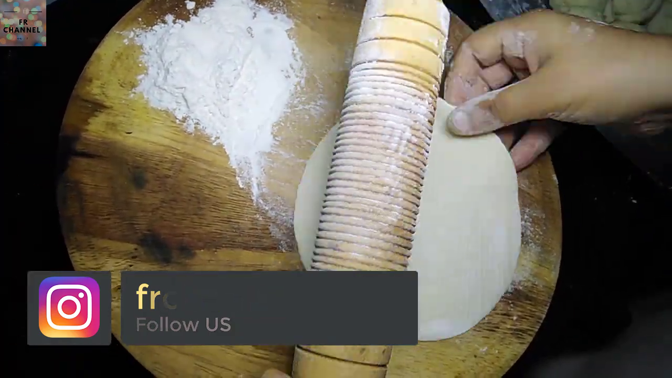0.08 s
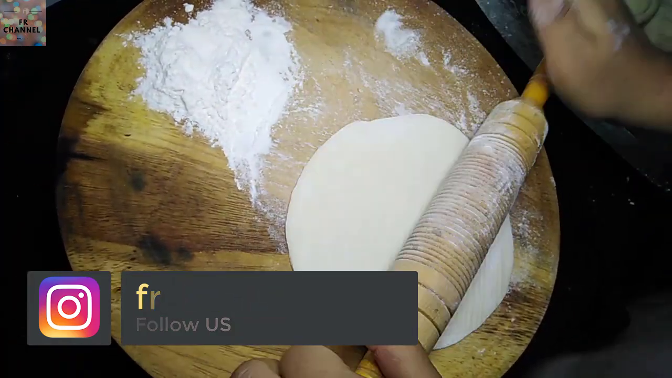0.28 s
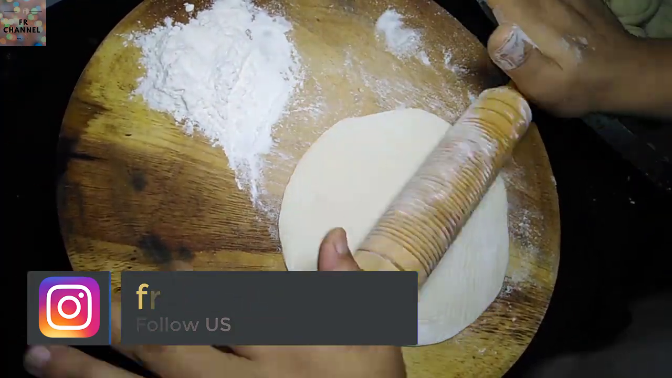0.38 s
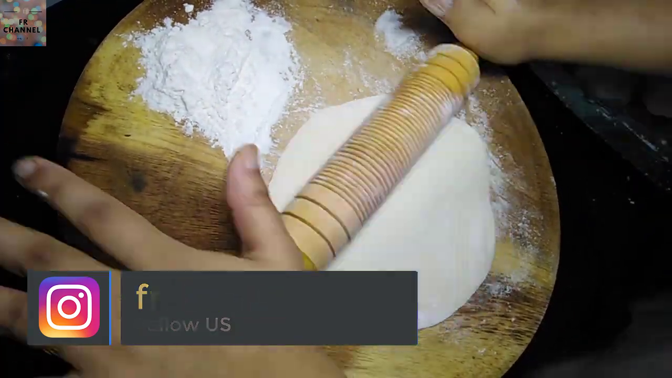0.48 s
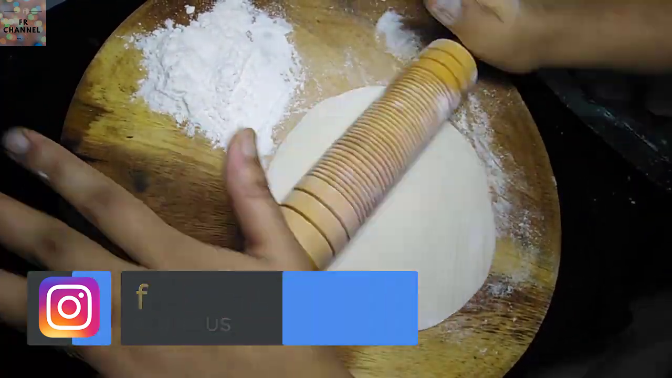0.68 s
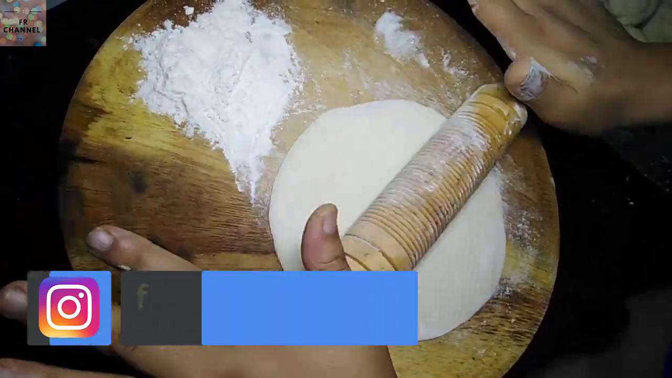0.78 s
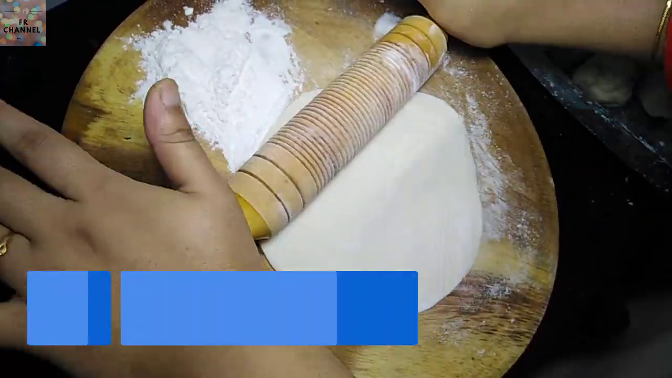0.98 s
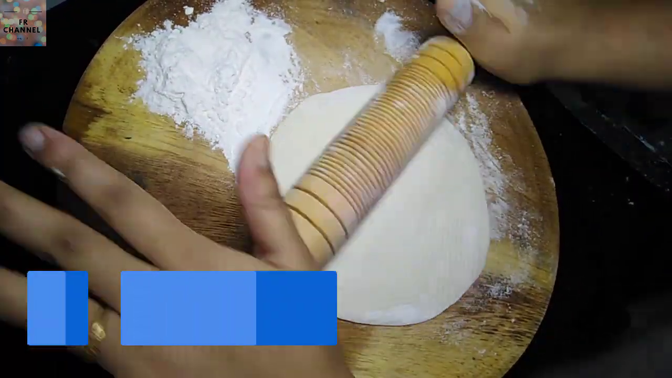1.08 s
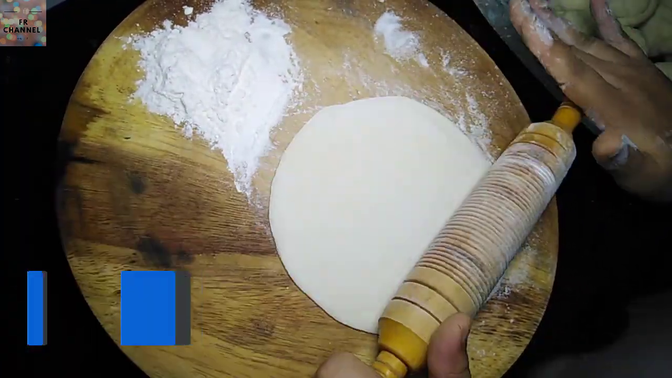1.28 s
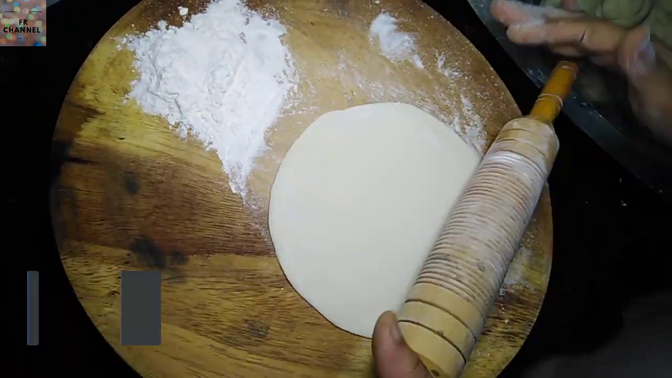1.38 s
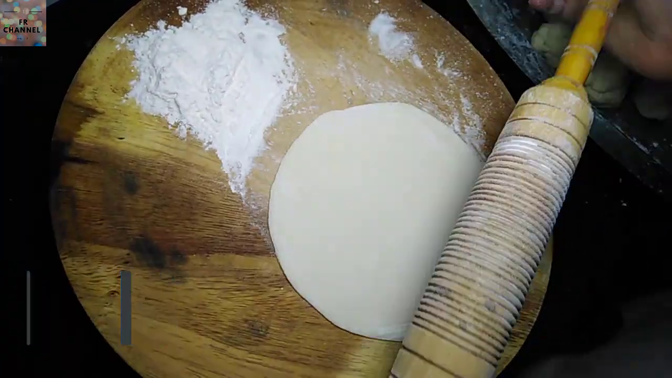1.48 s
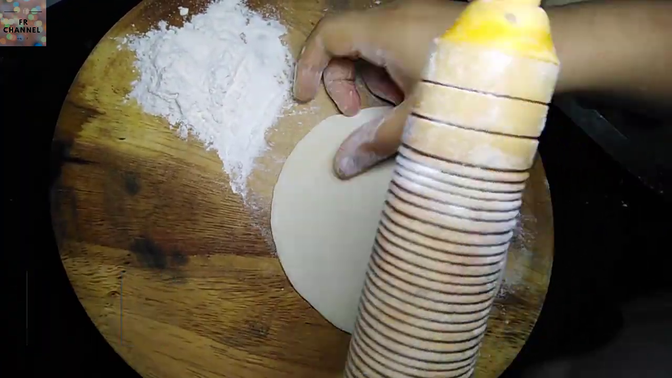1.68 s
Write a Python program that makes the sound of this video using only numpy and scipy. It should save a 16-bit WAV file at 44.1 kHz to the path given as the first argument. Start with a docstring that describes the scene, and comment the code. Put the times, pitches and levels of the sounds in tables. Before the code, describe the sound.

Rolling pin on floured dough: one dull wooden knock, then gentle dry rubbing strokes and faint taps

```python
"""A small kitchen: a grooved wooden rolling pin is set down on floured dough on a round wooden board
and rolled in short strokes. Flour grains hiss as streams of tiny clicks in shaped bands; the wood hums as
noise-driven resonances and the board rumbles as low noise. Knocks are pulses that ring the wood, the landing
thud is a rising low note, and a short rasp is noise with a climbing centre. Feedback delays make the room."""
import sys
import numpy as np
from scipy import signal
from scipy.fft import rfft, irfft, next_fast_len
from scipy.io import wavfile

SR = 44100
rng = np.random.default_rng(int(sys.argv[2]) if len(sys.argv) > 2 else 0)


def generate_wav(sig):
    """Save sig (samples, or channels by samples) to the path in sys.argv[1] as 16-bit PCM at SR."""
    pcm = np.round(np.clip(np.atleast_2d(sig).T, -1, 1) * 32767).astype(np.int16)
    wavfile.write(sys.argv[1], SR, pcm)


N = 74970
T = np.arange(N) / SR

# flour friction: (time [s], hiss level [dB], middle register relative to the hiss [dB])
FLOUR_FRICTION = [(0.0, -59, 1), (0.046, -52.5, -10.5), (0.074, -68, -4.5), (0.112, -78, 2),
                  (0.164, -83.5, -5), (0.184, -48.5, -20), (0.208, -47.5, 1), (0.24, -48, -10.5),
                  (0.254, -55, -6.5), (0.274, -59.5, -1), (0.388, -51, -2), (0.478, -56.5, -1),
                  (0.644, -50.5, -10), (0.728, -75.5, -7.5), (0.766, -74, -48), (0.794, -57, -16),
                  (0.828, -53, -11), (0.88, -58.5, -22), (0.932, -71.5, -54.5), (0.942, -72, -39),
                  (0.96, -64.5, -23), (1.012, -50, -6.5), (1.136, -60.5, -5), (1.212, -74, -3),
                  (1.24, -50, -8.5), (1.302, -52, -7), (1.358, -72, 2.5), (1.486, -77.5, -15),
                  (1.514, -73, -17), (1.562, -79, -22), (1.572, -53.5, -16), (1.614, -68, -13.5),
                  (1.628, -51.5, -7.5), (1.656, -61.5, -1), (1.676, -53.5, -9), (1.7, -65, -4)]
# colour of the hiss, then of the middle register: (frequency [Hz], relative density [dB per Hz])
HISS_SPECTRUM = [(2060, -26.5), (3500, -2.5), (3740, -14), (4790, -5.5), (5330, -3), (6600, 3), (8370, 0),
                 (9880, -6.5), (12300, -17.5), (13800, -16), (14400, -25)]
MIDDLE_SPECTRUM = [(880, -36), (1500, -5.5), (1670, -8), (2090, 2.5), (2480, -3.5), (2630, 0), (2800, -2),
                   (3720, -6.5), (4600, -2), (5980, -26), (10100, -120)]
# stereo lean of the noise bands: (frequency [Hz], left-right difference [dB])
TREBLE_BALANCE = [(1400, -5.5), (2200, 0.0), (3500, -2.5), (5000, 1.5), (6800, -9), (8600, 7.5), (10500, 9),
                  (14000, 5.5)]
# how alike the two channels are: (frequency [Hz], left-right likeness [-1 to 1])
LIKENESS = [(60, .985), (200, .97), (400, .85), (800, .5), (1500, .12), (3000, .05), (14000, 0.0)]
# hum of the wood under friction: (time [s], board level [dB], board pitch region [Hz],
# narrowness [dB per squared octave], pin level [dB])
WOOD_HUM = [(0, -71, 653, 40, -71.5), (.05, -97, 600, 12, -64), (.09, -77, 350, 196, -83),
            (.16, -106, 350, 100, -99), (.19, -63, 400, -7, -60.5), (.3, -56.5, 334, 4, -67),
            (.38, -62, 400, -8, -68.5), (.46, -62, 400, 8, -65.5), (.52, -64.5, 460, 194, -70.5),
            (.6, -63.5, 427, 49, -83.5), (.67, -64, 452, 26, -70), (.73, -84, 400, 15, -88),
            (.77, -85, 490, 30, -88), (.8, -69.5, 640, 11, -68), (.84, -66.5, 740, 51, -61),
            (.9, -78, 760, 74, -73), (.96, -92, 700, 57, -89), (.99, -65.5, 613, 398, -72),
            (1.03, -61.5, 605, 400, -69.5), (1.075, -66, 660, 150, -68.5), (1.13, -61.5, 564, 32, -70),
            (1.21, -75.5, 620, 37, -80.5), (1.235, -60.5, 610, 69, -61), (1.31, -62, 640, 35, -67.5),
            (1.36, -73.5, 640, 20, -74.5), (1.42, -76, 540, 27, -80), (1.55, -83.5, 550, 118, -89.5),
            (1.58, -80, 585, 30, -63), (1.615, -80, 570, 22, -80), (1.65, -68, 610, 14, -60),
            (1.7, -77, 597, 16, -77)]
# board and pin modes: (frequency [Hz], relative level [dB], t60 [s], left-right difference [dB])
WOOD_MODES = [(292, 0, 0.06, -10), (350, 2.5, 0.037, 10.5), (400, -6.5, 0.079, 11), (462, -1.5, 0.034, 7),
              (525.3, -1, 0.13, 9.5), (623, -3, 0.13, 6), (673, -3, 0.074, -1), (720, -2.5, 0.091, -9),
              (767, -6, 0.039, 20), (837, -10, 0.031, -9.5), (1049, -5.5, 0.039, -3.5),
              (1140, -3.5, 0.023, -11), (1250, -8.5, 0.11, 0.5), (1499, -13, 0.086, -2.5),
              (1920, -18, 0.012, 2), (2182, -7, 0.01, -3.5)]
# board rumble on the counter while the pin presses: (time [s], level before the rumble trim [dB])
RUMBLE_LEVEL = [(0, -76), (.16, -91), (.19, -62), (.21, -31.5), (.24, -36), (.27, -36), (.312, -42),
                (.37, -44.5), (.45, -51), (.524, -56), (.6, -67.5), (.756, -94), (.8, -78.5), (.87, -81.5),
                (.956, -75.5), (1.04, -79.5), (1.116, -76), (1.192, -84), (1.244, -77), (1.34, -77.5),
                (1.448, -93), (1.51, -86), (1.56, -74), (1.6, -54), (1.62, -63.5), (1.652, -53), (1.7, -53)]
# lowest board modes: (frequency [Hz], relative level [dB], width of the first resonance [Hz])
RUMBLE_MODES = [(67, -13, 59), (99.1, 2, 17.4), (121.5, 3, 17), (162.1, 1, 30.4), (243, -7, 57)]
# colour of the faint background: (frequency [Hz], relative density [dB per Hz])
FLOOR_SPECTRUM = [(24, -28), (40, 15), (124, -32), (193, 14), (518, -10.5), (891, -32.5), (1420, 4.5),
                  (2390, -20), (2630, -38), (3720, -88), (4750, -16), (8170, -0.5), (14400, -28)]
# knocks: (time [s], level [dB], pitch region struck [Hz], narrowness [dB per squared octave], crack level [dB])
KNOCKS = [(.198, -41, 400, 27, -63), (.2045, -30, 1570, 25, -52), (0.2072, -23.5, 486, 23, -56),
          (.213, -57, 600, 23, -70), (.2195, -30.5, 358, 34, -55), (.942, -61, 740, 47, -91),
          (1.0925, -40, 697, 30, -76), (1.109, -71, 720, 62, -72), (1.230, -50, 660, 60, -66),
          (1.571, -55, 1230, 33, -74), (1.6255, -35, 1160, 1, -56.5), (1.629, -71, 1270, 20, -62),
          (1.6417, -40.5, 655, 37, -56), (1.6576, -40.5, 1300, 17, -44), (1.662, -59, 1140, 18, -64)]
# flour puffs and ticks: (time [s], level before the low cut [dB], decay constant [s])
FLOUR_TICKS = [(.503, -60, 0.002), (0.941, -54, 0.0029), (0.963, -69, 0.002)]
# rasp climbing along the stroke: (start [s], length [s], from [Hz], to [Hz], level [dB], width [Hz])
RASP = (1.025, .085, 1150, 1750, -69, 260)
# microphone port resonances, left then right: (frequency [Hz], width [Hz], lift [dB])
PORTS = [(8320, 600, 4), (7350, 433, 3.5)]

GRAINS_PER_S, GRAIN_SPREAD_DB = 9000, -0.5
HISS_PATCHY_DB, MIDDLE_PATCHY_DB, FLOOR_PATCHY_DB = 2.5, 1.0, -3.0   # flicker of each noise band
PIN_FROM_HZ, HUM_WIDTH_HZ = 800, 20   # modes from here up belong to the pin; width of a rubbed mode
RUMBLE_TRIM_DB, FLOOR_DB = -4.0, -82.5
ROOM_T60_S, WALL_CUT_HZ = 0.23, 1740   # decay time in the lows; higher pitches die sooner
KNOCK_ROOM_DB, RUB_ROOM_DB = -14.5, -27   # sends into the room
KNOCK_LOW_CUT_HZ = 176
CONTACT_WIDTH, CONTACT_DB = 0.84, -2   # contact width as a share of the region's pitch; bare pulse level
MODE_TRIM_DB, MODE_CHANCE_DB = -8.5, 1.5   # ringing against the pulse; random spread per mode
CRACK_S, CRACK_HZ = .002, (1300, 3000)   # decay constant and band
THUD_S, THUD_FROM_HZ, THUD_TO_HZ, THUD_SEAT_S = .2115, 104, 188, .0225   # start, pitch rise, rise time
THUD_DB, THUD_ATTACK_S, THUD_T60_S = -17, .012, 0.16
TICK_FROM_HZ = 5400
CUTOFF_HZ = 14900


def amp(db):
    """dB to gain."""
    return 10 ** (np.asarray(db) / 20)


def rms_one(x):
    """Scale to rms 1."""
    return x / np.sqrt(np.mean(x ** 2) + 1e-20)


def in_time(rows):
    """Columns of a table joined by straight lines in time."""
    s, *columns = np.transpose(rows)
    return [np.interp(T, s, column) for column in columns]


def at_hz(points, hz):
    """Read a table on a log-frequency axis."""
    table_hz, values = np.transpose(points)
    return np.interp(np.log(hz), np.log(table_hz), values)


def pan(db):
    """Left and right gains for a left-right difference in dB."""
    return amp(np.array([[db / 2], [-db / 2]]))


def drift(rate_hz):
    """Slow random wander, rms 1: noise through two equal poles at the rate, drawn every 40 samples."""
    step = 40
    r = np.exp(-2 * np.pi * rate_hz * step / SR)
    noise = rng.standard_normal(N // step + 2002)
    slow = signal.lfilter([1], [1, -2 * r, r * r], noise)[2000:]   # skip the filter's start-up
    return np.interp(np.arange(N) / step, np.arange(len(slow)), rms_one(slow))


def stereo(mid, side, hz):
    """Two unrelated signals mixed to the left-right likeness at this pitch."""
    alike = np.clip(at_hz(LIKENESS, hz), -1, 1)
    return np.sqrt(1 + alike) * mid + np.sqrt(1 - alike) * side * [[1], [-1]]


def resonate(x, hz, width_hz):
    """A two-pole resonance with gain 1 on top."""
    r = np.exp(-np.pi * width_hz / SR)
    feedback = [1, -2 * r * np.cos(2 * np.pi * hz / SR), r * r]
    return signal.lfilter([(1 - r * r) / 2, 0, (r * r - 1) / 2], feedback, x)


def filtered(x, order, hz, kind):
    """Butterworth filter."""
    return signal.sosfilt(signal.butter(order, hz, kind, fs=SR, output="sos"), x)


def banded(source, spectrum, patchy_db):
    """Quarter-octave bands over a spectrum, each with level, flicker, likeness and balance; rms 1."""
    lowest, highest = spectrum[0][0], spectrum[-1][0]
    edges = lowest * 2 ** np.arange(0, np.log2(highest / lowest) + .3, 1 / 4)
    out = 0
    for k, (low, high) in enumerate(zip(edges, edges[1:])):
        # neighbouring bands take turns on two unrelated sources
        mid, side = filtered(source[k % 2], 2, [low, high], "band")
        hz = np.sqrt(low * high)
        gain = amp(at_hz(spectrum, hz) + patchy_db * drift(30.3))
        lean_db = at_hz(TREBLE_BALANCE, hz) * (hz > 1400)
        out = out + gain * pan(lean_db) * stereo(mid, side, hz)
    return rms_one(out)


def grains():
    """Four unrelated streams of tiny flour clicks of uneven size at random moments."""
    shape = (4, N)
    uneven = amp(GRAIN_SPREAD_DB * np.minimum(rng.exponential(1, shape), 4.0))
    size = uneven * rng.standard_normal(shape)
    strikes = rng.random(shape) < GRAINS_PER_S / SR
    return (size * strikes).reshape(2, 2, N)


def flour_rub(hiss):
    """Flour grains under friction: the hiss and a separate middle register follow the strokes."""
    hiss_db, middle_db = in_time(FLOUR_FRICTION)
    middle = banded(grains(), MIDDLE_SPECTRUM, MIDDLE_PATCHY_DB)
    return amp(hiss_db) * hiss + amp(hiss_db + middle_db) * middle


def hum():
    """Friction drives the board's modes near the region under the pin, and the pin's own modes."""
    board_db, region_hz, narrow_db, pin_db = in_time(WOOD_HUM)
    shares = np.array([amp(db - narrow_db * np.log2(hz / region_hz) ** 2) * (hz < PIN_FROM_HZ)
                       for hz, db, t60, lr in WOOD_MODES])
    # the board level is shared out by power
    shares = amp(board_db) * shares / np.sqrt((shares ** 2).sum(axis=0))
    out = 0
    for share, (hz, db, t60, lr) in zip(shares, WOOD_MODES):
        level = share if hz < PIN_FROM_HZ else amp(pin_db + db)
        narrow = resonate(rng.standard_normal((2, N)), hz, HUM_WIDTH_HZ)
        tone = resonate(narrow, hz, 11.8 * HUM_WIDTH_HZ)
        come_and_go = amp(2.0 * drift(3.0))
        out = out + level * come_and_go * pan(lr) * rms_one(stereo(*tone, hz))
    return out


def rumble():
    """Pressed on the counter, the board's lowest modes sound as twice-resonated noise."""
    level_db, = in_time(RUMBLE_LEVEL)
    low = 0
    for hz, db, width_hz in RUMBLE_MODES:
        narrow = resonate(rng.standard_normal((2, N)), hz, width_hz)
        mode = rms_one(resonate(narrow, hz, 2 * width_hz))
        low = low + amp(db) * stereo(*mode, hz)
    return amp(level_db + RUMBLE_TRIM_DB) * rms_one(low)


def faint_floor():
    """A steady background of shaped noise whose bands flicker."""
    return amp(FLOOR_DB) * banded(rng.standard_normal((2, 2, N)), FLOOR_SPECTRUM, FLOOR_PATCHY_DB)


def kitchen(x):
    """Room reflections: eight feedback delays a side, each pass softer and duller."""
    size = next_fast_len(N + SR)
    hz = np.arange(size // 2 + 1) * SR / size
    lags_s = rng.uniform(.012, .035, (2, 8, 1))
    loss = amp(-60 * lags_s / ROOM_T60_S) / (1 + 1j * hz / WALL_CUT_HZ)
    loop = loss * np.exp(-2j * np.pi * hz * lags_s)
    response = (loop / (1 - loop)).sum(axis=1)   # all the repeats summed
    return irfft(rfft(x.mean(axis=0), size) * response, size)[:, :N]


def ring(clicks, hz, t60):
    """A struck mode: a unit click sets a sine starting at height 1 ringing."""
    r, w = amp(-60 / (t60 * SR)), 2 * np.pi * hz / SR
    return signal.lfilter([0, np.sin(w)], [1, -2 * r * np.cos(w), r * r], clicks + 1e-18)


def knocks():
    """Each soft contact is a brief pulse that rings the modes near its pitch and adds a short crack."""
    out, length = np.zeros((2, N + SR)), SR // 4
    t = np.arange(length) / SR
    click = (np.arange(length) == 0) + 1e-18
    for s, db, region_hz, narrow_db, crack_db in KNOCKS:
        width_hz = CONTACT_WIDTH * region_hz
        touch = resonate(resonate(click, region_hz, width_hz), region_hz, width_hz)
        sound = amp(CONTACT_DB) * touch / np.abs(touch).max()
        for hz, mode_db, t60, lr in WOOD_MODES:
            distance_db = narrow_db * np.log2(hz / region_hz) ** 2
            chance_db = rng.normal(0, MODE_CHANCE_DB)
            gain = amp(mode_db + MODE_TRIM_DB - distance_db + chance_db)
            sound = sound + gain * pan(lr) * ring(touch, hz, t60)
        grit = rng.standard_normal((2, length))
        # the sides share part of their noise
        crack = filtered((grit[0] + 0.93 * grit) * np.exp(-t / CRACK_S), 2, CRACK_HZ, "band")
        start = int(s * SR)
        out[:, start:start + length] += amp(db) * sound + amp(crack_db) * crack
    return filtered(out[:, :N], 4, KNOCK_LOW_CUT_HZ, "high")


def thud():
    """The board settles after the pin lands: one low note swells, rises as it seats and dies."""
    t = np.maximum(T - THUD_S, 0)
    hz = THUD_TO_HZ + (THUD_FROM_HZ - THUD_TO_HZ) * np.exp(-(t / THUD_SEAT_S) ** 2)
    swell = 1 - np.exp(-(t / THUD_ATTACK_S) ** 2)
    decay = amp(-60 * t / THUD_T60_S)
    phase = 2 * np.pi * np.cumsum(hz * (t > 0)) / SR
    return amp(THUD_DB) * swell * decay * np.sin(phase)


def flour_ticks(hiss):
    """Lumps of flour tick in the treble only: sudden, fast-dying bursts of the hiss, low cut."""
    bursts = sum(amp(db) * (T > s) * np.exp(-np.maximum(T - s, 0) / decay_s)
                 for s, db, decay_s in FLOUR_TICKS)
    return filtered(bursts * hiss, 4, TICK_FROM_HZ, "high")


def rasp():
    """Narrow noise that swells and fades while its centre climbs along the stroke."""
    start_s, length_s, from_hz, to_hz, db, width_hz = RASP
    along = np.clip((T - start_s) / length_s, 0, 1)
    phase = 2 * np.pi * np.cumsum(from_hz + (to_hz - from_hz) * along) / SR
    # slow noise on a sine and a cosine makes a noise band around the moving centre
    slow = rms_one(filtered(rng.standard_normal((2, 2, N)), 2, width_hz / 2, "low"))
    return amp(db) * np.sin(np.pi * along) * (slow[0] * np.sin(phase) + slow[1] * np.cos(phase))


def scene():
    """Flour, hum, rumble, knocks, thud and rasp over a faint floor; flour and knocks feed the room."""
    hiss = banded(grains(), HISS_SPECTRUM, HISS_PATCHY_DB)
    flour = flour_rub(hiss) + flour_ticks(hiss)
    hits = knocks()
    room = kitchen(amp(KNOCK_ROOM_DB) * hits + amp(RUB_ROOM_DB) * flour)
    return flour + hum() + rumble() + faint_floor() + room + hits + thud() + rasp()


def record(dry):
    """Each microphone port lifts its own treble band; a steep filter cuts the top."""
    wet = np.array([x + (amp(lift_db) - 1) * resonate(x, hz, width_hz)
                    for x, (hz, width_hz, lift_db) in zip(dry, PORTS)])
    return signal.sosfilt(signal.cheby2(18, 70, CUTOFF_HZ, fs=SR, output="sos"), wet)


dry = scene()
out = record(dry)
generate_wav(out)
```